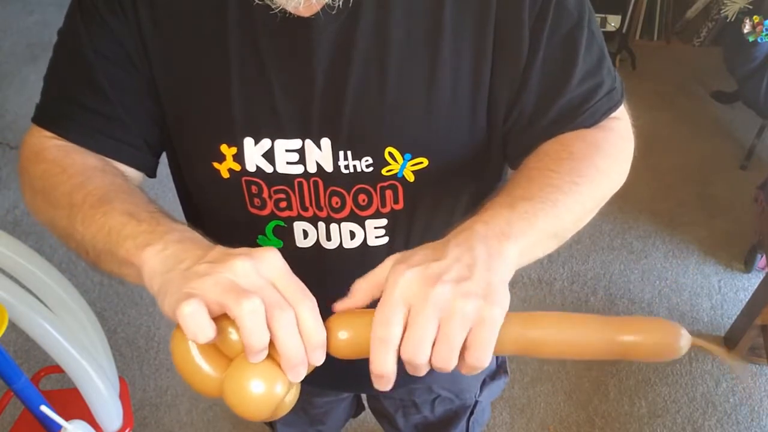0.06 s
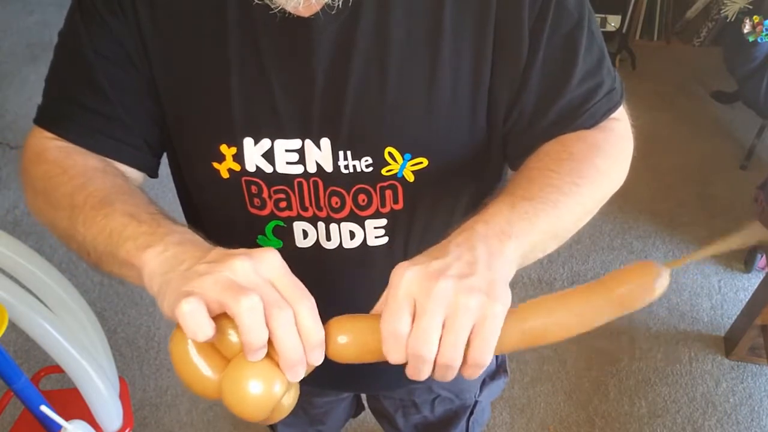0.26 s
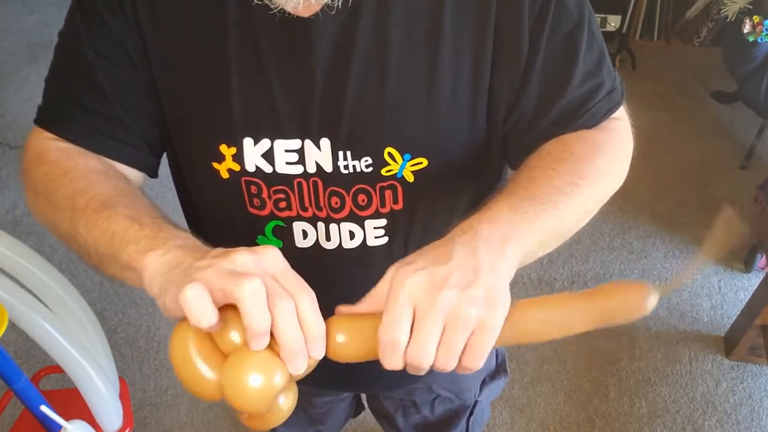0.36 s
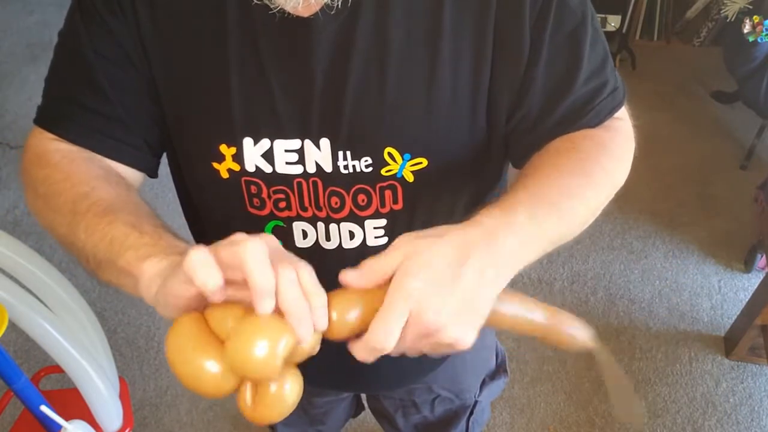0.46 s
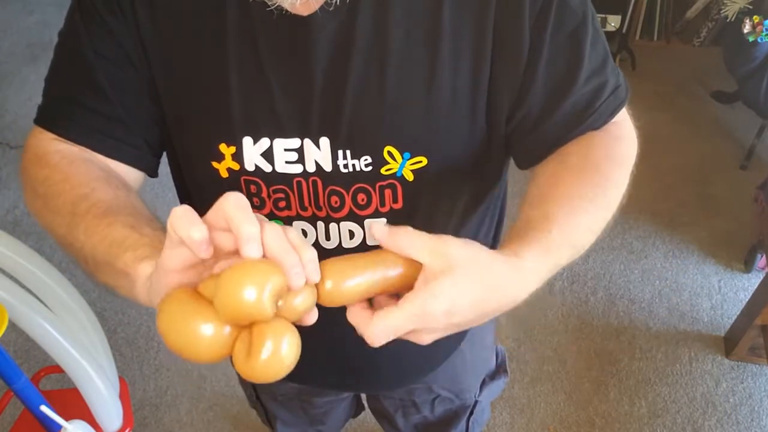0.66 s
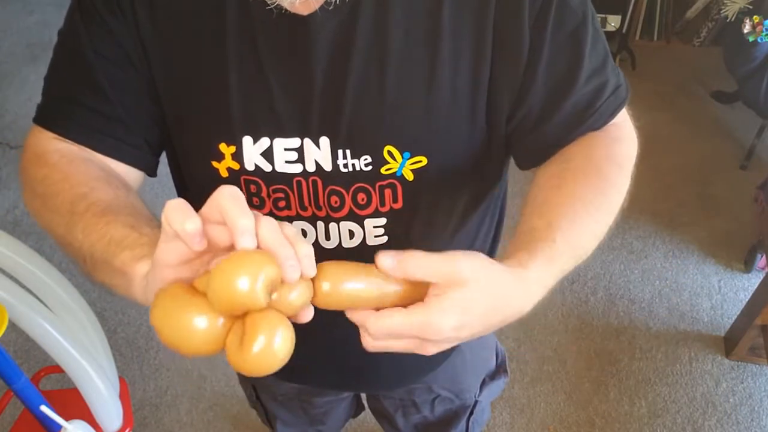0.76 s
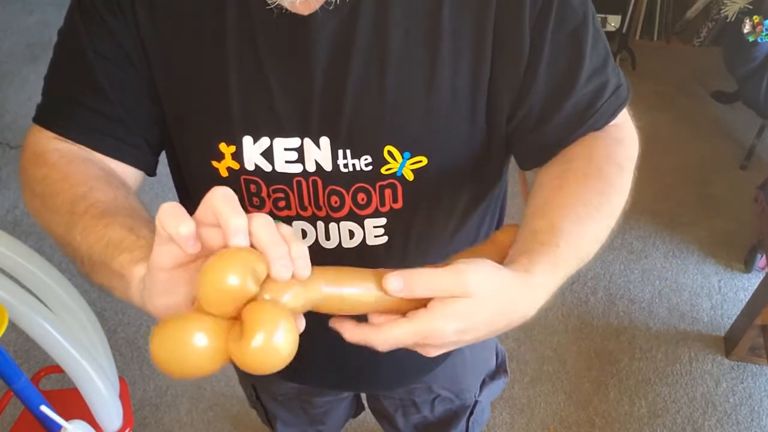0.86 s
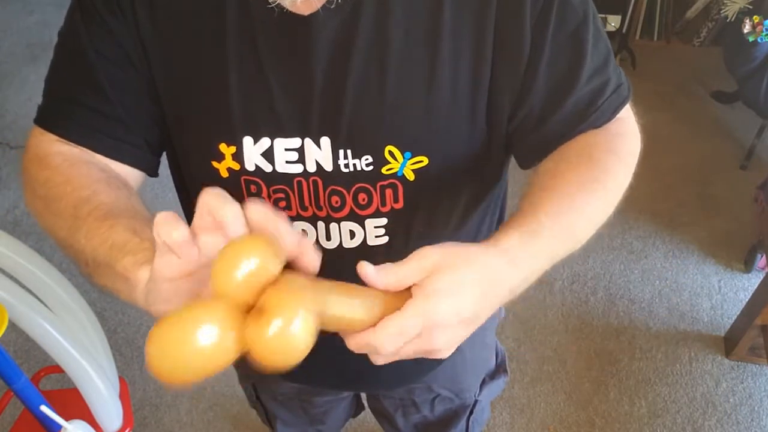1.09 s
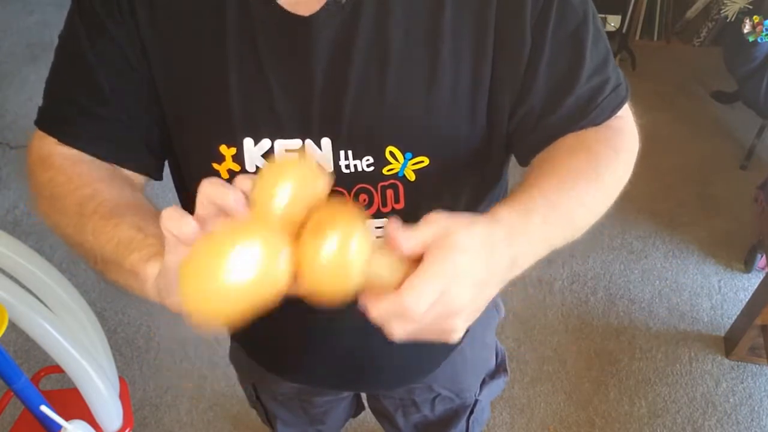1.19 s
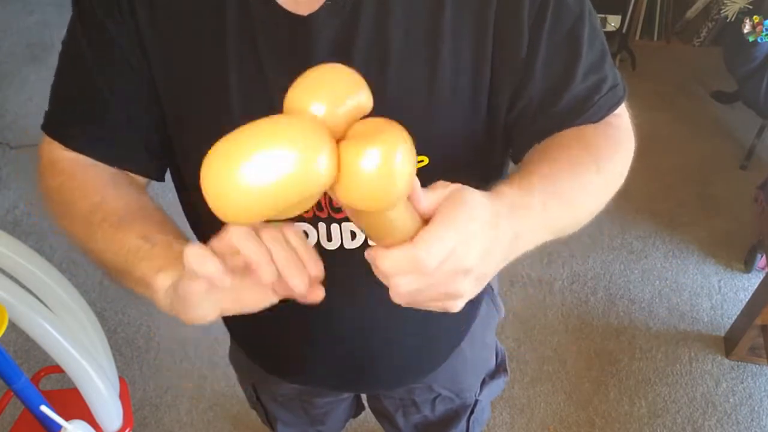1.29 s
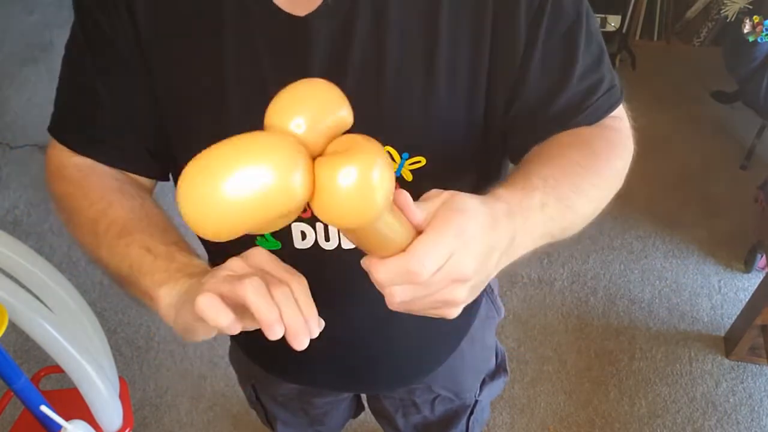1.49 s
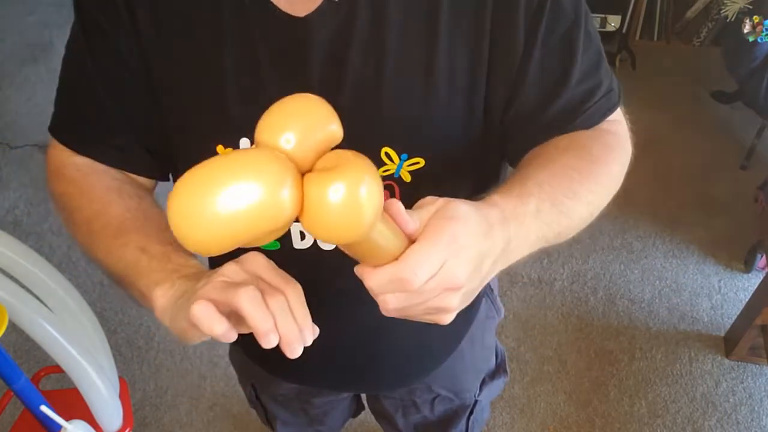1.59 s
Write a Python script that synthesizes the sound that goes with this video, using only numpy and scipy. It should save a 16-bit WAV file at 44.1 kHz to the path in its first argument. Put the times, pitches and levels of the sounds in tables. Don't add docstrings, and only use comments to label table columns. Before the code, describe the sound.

Balloon squeaks, close in stereo: hands rub and twist taut latex. From 0.1 to 0.6 s, short groans, chirps and small clicks over hissing palm rubs; a softer gap, then honks and creaks from 0.7 s. At 0.93 s a sharp snap with hollow thump; at 1.12 s a loud rising squeak. Clicks and creaks at 1.22-1.36 s fade into soft room rumble, faint hum and hiss.

```python
import sys
import numpy as np
from scipy import signal
from scipy.fft import rfft, irfft, next_fast_len
from scipy.io import wavfile

SR = 44100
rng = np.random.default_rng(int(sys.argv[2]) if len(sys.argv) > 2 else 0)


def generate_wav(signal):
    frames = np.transpose(np.atleast_2d(signal))
    scaled = np.clip(frames, -1, 1) * 32767
    pcm = np.round(scaled).astype(np.int16)
    wavfile.write(sys.argv[1], SR, pcm)


def how_loud(loudness_db):
    steps = np.asarray(loudness_db, float) / 20
    return 10 ** steps


N = 72765

# pitch [Hz], width [Hz], level [dB].
NECK_RINGS = [(1150, 400, -7), (1650, 400, -.5), (2300, 800, -1.5), (3500, 1300, 1.5), (5400, 1800, -2.5),
              (10000, 7000, -2.5)]
# pitch [Hz], width [Hz], level [dB].
BUBBLE_RINGS = [(60, 40, -23), (110, 40, -17), (270, 90, -5), (370, 120, -5), (530, 120, -1.5),
                (650, 120, -1.5), (820, 180, -2.5), (1500, 250, .5), (2500, 1200, -3)]


def rms_one(x):
    return x / np.sqrt(np.mean(x ** 2) + 1e-20)


def colour(points, size):
    hz, db = np.transpose(points)
    grid_hz = np.arange(size // 2 + 1) * SR / size
    return how_loud(np.interp(np.log(grid_hz + 1), np.log(hz), db))


def shaped(x, points):
    size = x.shape[-1]
    return rms_one(irfft(rfft(x) * colour(points, size), size))


def band_filter(x, order, hz, kind="low"):
    return signal.sosfilt(signal.butter(order, hz, kind, fs=SR, output="sos"), x)


def body(push, rings):
    out = 0
    for k, (hz, width_hz, db) in enumerate(rings):
        decay = np.exp(-np.pi * width_hz / SR)
        turn = 2 * np.pi * hz / SR
        ring = signal.lfilter([0, np.sin(turn)], [1, -2 * decay * np.cos(turn), decay * decay], push + 1e-18)
        out = out + (-1) ** k * how_loud(db) * ring
    return out


def slips(runs, rings, tilt_db, arch_db, jitter, wander, uneven_db, sign=1):
    clicks = np.zeros(N)
    for start, length, first_hz, last_hz, db in runs:
        chance = rng.standard_normal((80, 3))
        count = np.arange(len(chance))
        glide = np.log(last_hz / first_hz + 1e-6) / length
        t = np.log(np.maximum(1 + glide * count / first_hz, 1e-9)) / glide
        t = t + (jitter * chance[:, 0] + wander * np.cumsum(chance[:, 2])) / first_hz
        on = (t >= 0) & (t < length)
        done = t[on] / length
        tilt = tilt_db * (done - 1) if tilt_db > 0 else tilt_db * done
        arch = arch_db * (2 * done - 1) ** 2
        strength = sign * how_loud(db + tilt - arch + uneven_db * chance[on, 1])
        at = (start + t[on]) * SR
        np.add.at(clicks, at.astype(int), strength * (1 - at % 1))
        np.add.at(clicks, at.astype(int) + 1, strength * (at % 1))
    return body(clicks, rings)


def tube_squeaks():
    # start [s], length [s], first rate [Hz], last rate [Hz], peak level [dB].
    groan_runs = [
        (.066, .012, 810, 790, -45),
        (.177, .014, 320, 300, -30),
        (.266, .02, 900, 800, -41),
        (.335, .04, 264, 258, -33),
        (.44, .045, 560, 570, -37),
        (.533, .055, 600, 580, -35),
        (.822, .034, 600, 480, -32),
        (.14, .035, 270, 280, -44),
    ]
    note_runs = [
        (.197, .026, 830, 800, -33),
        (.245, .02, 1030, 960, -33),
        (1.25, .017, 575, 590, -29),
    ]
    glide_runs = [
        (.285, .031, 358, 270, -24),
        (.316, .02, 268, 258, -24),
    ]
    # pitch [Hz], width [Hz], level [dB].
    tube_rings = [(340, 200, -15), (580, 200, -6), (830, 260, 0), (1400, 300, -6), (2050, 300, -7),
                  (3050, 400, -10), (4500, 2000, -13)]
    slack_rings = [(540, 200, -9), (860, 320, .5), (1400, 300, -9)]
    groans = slips(groan_runs, tube_rings, tilt_db=-1.5, arch_db=6, jitter=.05, wander=.06, uneven_db=3)
    notes = slips(note_runs, tube_rings, tilt_db=1.5, arch_db=5, jitter=.05, wander=.045, uneven_db=2.5)
    glides = slips(glide_runs, slack_rings, tilt_db=1.5, arch_db=3, jitter=.01, wander=.01, uneven_db=1.5)
    return groans + notes + glides


def bubble_honks():
    # start [s], length [s], first rate [Hz], last rate [Hz], peak level [dB].
    honk_runs = [
        (.384, .028, 270, 255, -38),
        (.76, .044, 372, 362, -35),
        (.177, .022, 300, 310, -40),
        (.715, .035, 390, 385, -48),
        (1.0, .05, 262, 260, -41),
        (1.14, .03, 500, 480, -45),
    ]
    return slips(honk_runs, BUBBLE_RINGS, tilt_db=-1.5, arch_db=5, jitter=.015, wander=.015, uneven_db=1.5)


def neck_squeaks():
    # start [s], length [s], first rate [Hz], last rate [Hz], peak level [dB].
    creak_runs = [
        (.128, .014, 1580, 1560, -46),
        (.478, .048, 600, 620, -35),
        (.545, .045, 300, 290, -35),
        (.824, .016, 580, 570, -29),
        (.855, .04, 420, 480, -36),
        (1.15, .07, 330, 280, -41),
        (1.2245, .012, 280, 300, -34),
        (1.341, .024, 330, 260, -25),
    ]
    swell_runs = [
        (.893, .03, 730, 1150, -29),
        (1.1155, .032, 275, 390, -12.5),
        (1.255, .0105, 570, 585, -25),
    ]
    creaks = slips(creak_runs, NECK_RINGS, tilt_db=-1.5, arch_db=3, jitter=.1, wander=.07, uneven_db=3)
    swells = slips(swell_runs, NECK_RINGS, tilt_db=22, arch_db=11, jitter=.015, wander=.015, uneven_db=1.2,
                   sign=-1)
    return band_filter(creaks + swells, 2, 850, "high")


def chafes():
    # start [s], length [s], rate [Hz], peak level [dB], pitch of the patch [Hz].
    chafe_runs = [(.204, .016, 420, -34, 1050), (.2, .022, 700, -38, 2150), (.226, .012, 400, -37, 850),
                  (.248, .042, 1010, -40, 3050), (.25, .03, 1000, -41, 2000), (.264, .018, 400, -39, 780),
                  (.296, .034, 270, -36, 1380), (.385, .024, 260, -39, 720), (.823, .014, 575, -30, 1720),
                  (.486, .024, 620, -29.5, 2150), (.48, .04, 700, -36, 3900), (.462, .025, 520, -45, 530),
                  (.508, .018, 650, -36, 1350), (.512, .014, 600, -34, 2500), (.536, .018, 600, -33, 1900),
                  (.557, .014, 580, -32, 1250), (.577, .01, 600, -37, 1400), (.892, .02, 770, -32, 1550),
                  (.906, .012, 1100, -37, 1120), (.912, .016, 1000, -31, 2500),
                  (.9285, .01, 500, -21, 1520), (1.165, .055, 300, -38, 1900), (1.225, .03, 330, -32, 1450),
                  (1.222, .028, 330, -29, 2200), (1.316, .006, 900, -31, 6800),
                  (1.323, .013, 600, -33, 6600), (1.323, .012, 500, -36, 2500),
                  (1.342, .01, 500, -27, 1200), (1.358, .018, 500, -34, 2300)]
    sharpness = 5.0
    out = 0
    for start, length, hz, db, patch_hz in chafe_runs:
        run = (start, length, hz, hz * .97, db)
        patch = (patch_hz, patch_hz / sharpness, 0)
        out = out + slips([run], [patch], tilt_db=1.5, arch_db=7, jitter=.05, wander=.04, uneven_db=3)
    return out


def snaps():
    # time [s], peak level [dB].
    snap_times = [(.1067, -27), (.1785, -26), (.1995, -28), (.2437, -27), (.318, -29), (.3838, -33),
                  (.4497, -32), (.558, -28), (.5027, -28), (.678, -30), (.8235, -23), (.9298, -10),
                  (.933, -16), (1.2203, -26), (1.2632, -17), (1.3169, -21), (1.3388, -17), (1.3478, -23),
                  (1.3538, -21)]
    clicks = np.zeros(N)
    for s, db in snap_times:
        clicks[int((s + .001) * SR)] = how_loud(db - 3)
    crack = how_loud(3) * band_filter(clicks, 2, [900, 7000], "band")
    return body(clicks, NECK_RINGS) + crack + how_loud(-5) * clicks


def thumps():
    # time [s], peak level [dB], sharpness of the push [Hz].
    thump_pushes = [(.9185, -15, 350), (.924, -22, 1200), (.9292, -14, 2500), (.934, -16, 1500),
                    (.938, -16, 900), (.9475, -14, 1100), (.953, -19, 800), (.9575, -21, 500),
                    (.966, -28, 500), (.977, -31, 900), (.99, -33, 700), (1.006, -30, 700),
                    (1.04, -33, 300), (1.14, -34, 150), (1.34, -30, 250), (1.352, -29, 250)]
    pushes, t = np.zeros(N), np.arange(N) / SR
    for s, db, sharp_hz in thump_pushes:
        since = np.maximum(t - s, 0)
        push = since * np.exp(-2 * np.pi * sharp_hz * since)
        pushes -= how_loud(db) * push / push.sum()
    return body(pushes, BUBBLE_RINGS)


def grains():
    grains_per_s, spread_db, smooth_share = 2000, 4, .55
    sizes = how_loud(spread_db * np.minimum(rng.exponential(1, N), 5)) * rng.choice([-1, 1], N)
    catches = rms_one(sizes * (rng.random(N) < grains_per_s / SR))
    return np.sqrt(smooth_share) * rng.standard_normal(N) + np.sqrt(1 - smooth_share) * catches


def palms():
    # time of the peak [s], hiss level [dB], rise [s per 20 dB], fall [s per 20 dB],
    # hollow rub over hiss [dB].
    palm_strokes = [(.002, -49, .02, .08, 3), (.066, -45, .1, .09, -6), (.108, -42, .003, .012, -6),
                    (.185, -50, .015, .1, 7), (.225, -45, .08, .06, 2), (.256, -40, .05, .12, 0),
                    (.32, -49, .1, .12, -1.5), (.39, -49, .04, .12, 5), (.458, -45, .1, .1, 0),
                    (.51, -39, .12, .12, -8), (.565, -46, .08, .1, 6), (.66, -49, .2, .3, -8),
                    (.733, -46, .01, .12, -8), (.776, -41, .06, .08, -3), (.832, -41, .015, .2, -5),
                    (.88, -40, .12, .1, -12), (.93, -36, .06, .07, 7), (1.02, -51, .1, .08, 7),
                    (1.144, -46, .04, .08, 0), (1.18, -56, .06, .06, 3), (1.262, -44, .05, .08, 2),
                    (1.318, -47, .006, .03, 3), (1.343, -38, .015, .06, 3), (1.39, -51, .06, .1, -1.5)]
    # frequency [Hz], level [dB].
    hiss_colour = [(300, -18), (1000, -11), (2500, -4), (5000, -3), (7000, -3), (8000, -6), (12000, -2.5),
                   (16500, -3)]
    hollow_colour = [(40, -18), (100, -5), (260, -.5), (600, -1.5), (1100, -8), (2300, -9), (5000, -26)]
    t, hiss_power, hollow_power = np.arange(N) / SR, 0, 0
    for s, db, rise, fall, hollow_db in palm_strokes:
        away = np.maximum((s - t) / rise, (t - s) / fall)
        power = how_loud(2 * (db - 20 * away))
        hiss_power = hiss_power + power
        hollow_power = hollow_power + power * how_loud(2 * hollow_db)
    hiss = how_loud(2.5) * np.sqrt(hiss_power) * shaped(grains(), hiss_colour)
    hollow = how_loud(-4) * np.sqrt(hollow_power) * shaped(grains(), hollow_colour)
    return hiss + hollow


def room(x, wide):
    # frequency [Hz], level difference [dB].
    left_over_right = [(60, .8), (250, -.4), (600, -2), (1400, -3), (2800, -4), (5000, -8), (7600, -8),
                       (8400, -.8)]
    # frequency [Hz], level [dB].
    unlike_colour = [(60, -9), (300, -16), (800, -6), (2000, -3), (5000, -2), (7500, -2), (8500, -9),
                     (16000, -8)]
    near_s, echo_s = .015, .21
    near_db, tail_db, dull_hz = -19, -11, 5000
    size = next_fast_len(N + SR)
    t = np.arange(SR // 2) / SR
    noise = rng.standard_normal((4, len(t)))
    near = noise[2:] * how_loud(-20 * t / near_s)
    tail = noise[:2] * how_loud(-60 * t / echo_s) * np.clip(t / .01, 0, 1)
    opposite = np.array([[1], [-1]])
    tail = band_filter(tail[0] + .6 * tail[1] * opposite, 1, dull_hz)

    def unit(echo):
        return rfft(echo / np.sqrt(np.sum(echo ** 2, axis=-1, keepdims=True)), size)

    alike = rfft(x, size) * (1 + how_loud(near_db) * unit(near[0]) + how_loud(tail_db) * unit(tail))
    unlike = rfft(wide, size) * colour(unlike_colour, size) * unit(near[1]) * opposite
    tilt = np.sqrt(colour(left_over_right, size))
    return irfft((alike + unlike) * [tilt, 1 / tilt], size)[:, :N]


def background():
    # frequency [Hz], level [dB].
    air_colour = [(20, -16), (60, -1.5), (120, -4), (250, -3), (350, -10), (600, -28), (5000, -42),
                  (16000, -39)]
    mic_colour = [(1500, -14), (4500, -10), (7000, -1.5), (9000, -9), (13000, -1.5), (16000, -3)]
    hum_hz, hum_db, waver_hz = 123.5, -61, 4
    noise = rng.standard_normal((3, N))
    air = how_loud(-64) * shaped(noise[0] + .35 * noise[1:], air_colour)
    slow = band_filter(rng.standard_normal((2, N + SR)), 2, waver_hz)[:, SR:]
    wobble, sway = rms_one(slow[0]), rms_one(slow[1])
    hum = np.sin(2 * np.pi * hum_hz * np.arange(N) / SR + .25 * sway) * how_loud(hum_db + 3 + 1.8 * wobble)
    mic_hiss = how_loud(-76) * shaped(rng.standard_normal((2, N)), mic_colour)
    return air + hum + mic_hiss


def scene():
    rubber = tube_squeaks() + bubble_honks() + neck_squeaks() + snaps() + thumps() + chafes()
    return room(rubber + palms(), rubber + palms()) + background()


def band_limit(x):
    return signal.sosfilt(signal.butter(12, 16150, fs=SR, output="sos"), x)


def record(dry):
    cut = signal.sosfilt(signal.cheby2(16, 70, 16500, fs=SR, output="sos"), dry)
    cut = band_filter(cut, 2, 45, "high")
    return band_limit(cut)


dry = scene()
out = record(dry)
generate_wav(out)
```